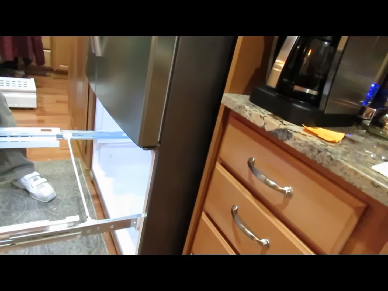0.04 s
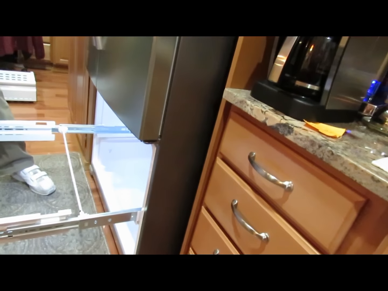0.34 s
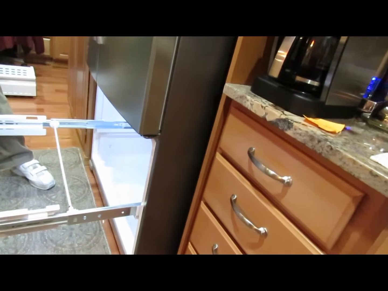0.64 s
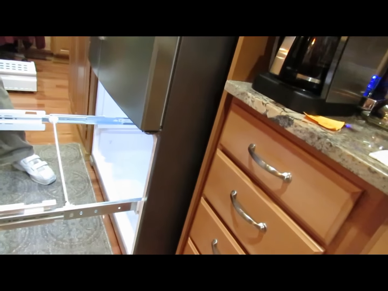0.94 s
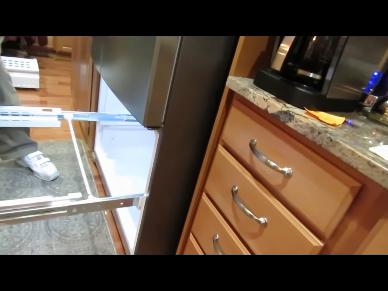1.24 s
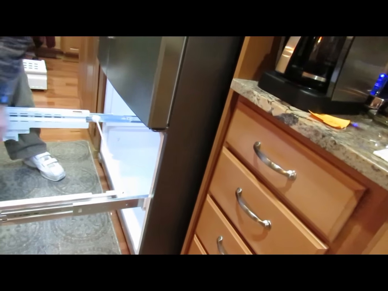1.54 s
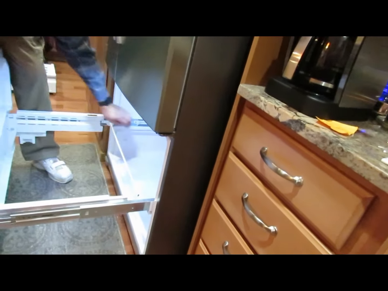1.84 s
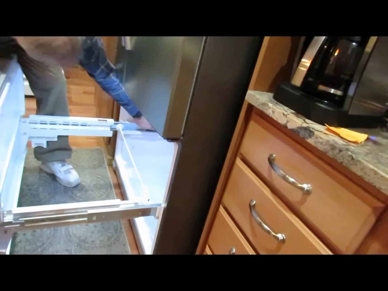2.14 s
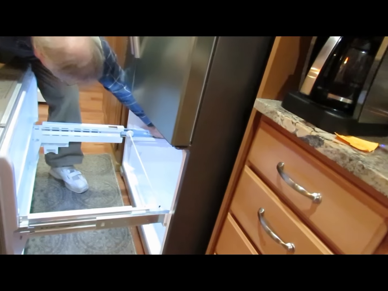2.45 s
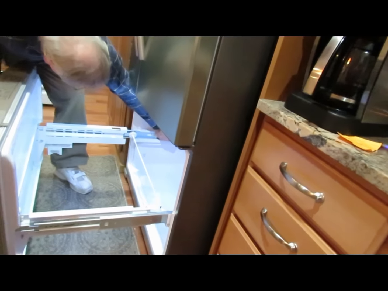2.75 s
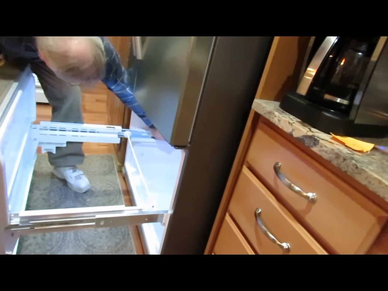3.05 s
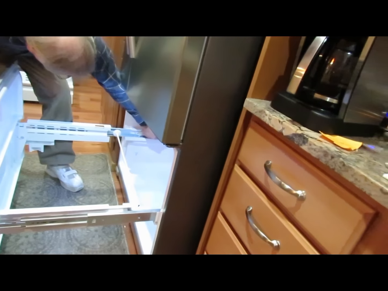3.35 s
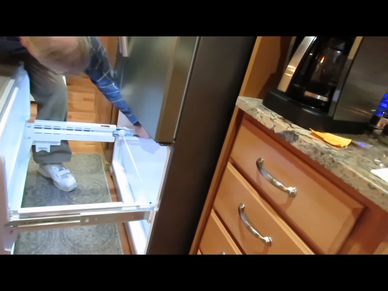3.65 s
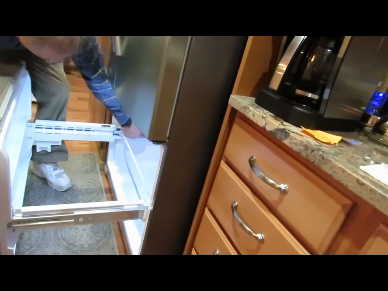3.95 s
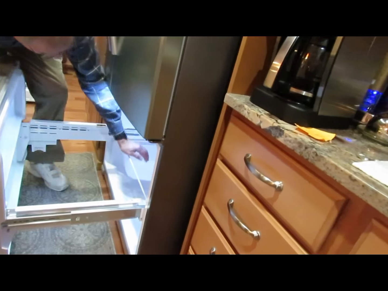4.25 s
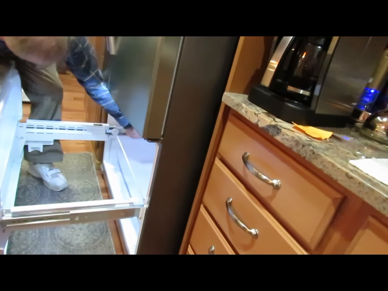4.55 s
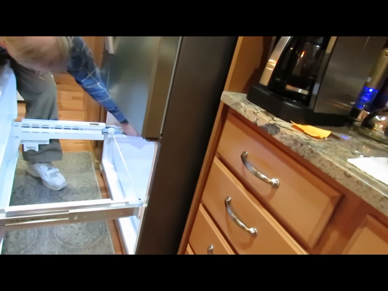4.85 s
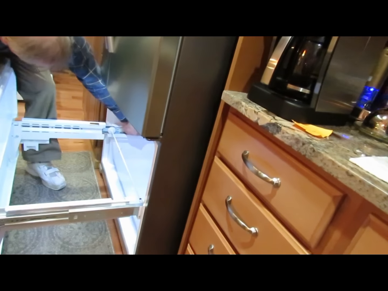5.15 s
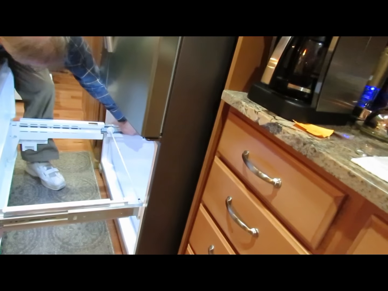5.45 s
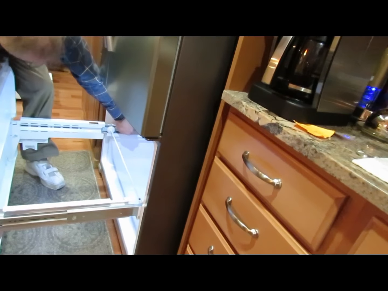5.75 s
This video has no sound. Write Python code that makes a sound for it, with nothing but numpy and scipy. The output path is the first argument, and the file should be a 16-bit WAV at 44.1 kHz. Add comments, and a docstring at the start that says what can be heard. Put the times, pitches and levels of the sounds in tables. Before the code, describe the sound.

A freezer drawer rolls on metal slides, clacking and thumping against its hollow cabinet, with small plastic clicks over a faint hum.

```python
"""Freezer drawer in a quiet kitchen

Two close microphones, the scene a little to their left. Over room air and a faint motor hum, a drawer
frame rolls on ball bearings, snaps home on its steel slides and bumps the hollow cabinet. A sleeve
rustles as a hand reaches in, clicking plastic clips and knocking the liner. The small room answers."""
import sys
import numpy as np
from scipy import signal
from scipy.fft import rfft, irfft, next_fast_len
from scipy.io import wavfile
from scipy.ndimage import map_coordinates

SR = 44100
rng = np.random.default_rng(int(sys.argv[2]) if len(sys.argv) > 2 else 0)


def int16_out(signal):
    """Quantize to a 16-bit WAV file."""
    q = np.round(np.clip(np.atleast_2d(signal).T, -1, 1) * 32767)
    wavfile.write(sys.argv[1], SR, q.astype(np.int16))


N = 264776
T = np.arange(N) / SR
RING_T = np.arange(SR // 2) / SR  # time since a contact, s


def amp(db):
    """Gain of a level in dB."""
    return 10 ** (np.asarray(db) / 20)


def unit(x):
    """x at rms 1."""
    return x / np.sqrt(np.mean(x ** 2) + 1e-20)


def along(points, hz):
    """(f/Hz, value) points read on a log frequency axis."""
    f, values = np.transpose(points)
    return np.interp(np.log(hz + 1), np.log(f + 1), values)


def peak(hz, centre, width):
    """Height 0-1 of a resonance."""
    return 1 / (1 + (2 * (hz - centre) / width) ** 2)


def lift(resonances, hz):
    """dB added by (f/Hz, width/Hz, lift/dB) resonances."""
    return sum(db * peak(hz, centre, width) for centre, width, db in resonances)


def filtered(x, response):
    """x with its spectrum scaled by response(hz)."""
    n = x.shape[-1]
    padded = next_fast_len(n + 8192)
    gain = response(np.fft.rfftfreq(padded, 1 / SR))
    return irfft(rfft(x, padded) * gain, padded)[..., :n]


def add(track, start, sound):
    """Mix a sound into the track from start seconds on."""
    part = track[..., max(round(start * SR), 0):][..., :sound.shape[-1]]
    part += sound[..., :part.shape[-1]]


# Width of diffuse sound at the microphone pair: f/Hz, side minus mid/dB
STEREO_WIDTH = [(60, -29.5), (110, -24.5), (200, -21), (380, -12), (700, -13.5), (1290, -15), (2380, -10.5),
                (4400, -8.5), (8120, -3.5), (15000, -4.5)]
def diffuse(size, side_db):
    """Stereo noise as two close microphones hear it: alike in the bass, apart in the treble."""
    mid, side = rng.standard_normal((2, size))
    side = filtered(side, lambda hz: amp(along(STEREO_WIDTH, hz) + side_db))
    return np.array([mid + side, mid - side])


def room(x, wet_db, t60):
    """The direct sound at the microphones, plus the kitchen's short answer."""
    tail = diffuse(len(RING_T), side_db=-0.5) * amp(-60 * RING_T / t60) * (1 - np.exp(-RING_T / .008))
    tail /= np.linalg.norm(tail[0])
    return x + amp(wet_db) * signal.fftconvolve(x[None], tail, axes=1)[:, :N]


def wobble(rate):
    """A smooth random curve, rate knots a second."""
    knots = rng.standard_normal(int(N * rate / SR) + 4)
    return map_coordinates(knots, [np.arange(N) * rate / SR])


# Spectrum of the air all around the microphones: f/Hz, relative level/dB
ROOM_AIR = [(15, -33.5), (25, -20.5), (109, -6.5), (139, -8), (181, 2.5), (250, -5.5), (318, -4.5),
            (709, -18.5), (927, -16.5), (1000, -18.5), (1210, -18.5), (1910, -27), (2240, -33),
            (12800, -58), (15000, -58)]
# Tones of the motor: f/Hz, rms level/dB
MOTOR_TONES = [(59.2, -56.5), (166.9, -47.5), (306.8, -64), (479.1, -56.5), (818.3, -61.5), (936.7, -60.5)]
def room_tone(air_db=-42, drone_db=-47, waver_rad=0.26):
    """Kitchen air, a motor's wavering hum and a fan's drone in two low resonances of the cabinet."""
    air = unit(filtered(diffuse(N, side_db=7.5), lambda hz: amp(along(ROOM_AIR, hz))))
    hum, lowest_hz = np.zeros(N), MOTOR_TONES[0][0]
    for hz, db in MOTOR_TONES:
        drift = waver_rad * hz / lowest_hz * wobble(3)
        hum += amp(db) * np.sqrt(2) * np.sin(2 * np.pi * hz * T + drift)
    hollow = lambda hz: peak(hz, 179, 24) + peak(hz, 296.4, 39)
    drone = unit(filtered(diffuse(N, side_db=-19.5), hollow))
    return amp(air_db) * air + hum + amp(drone_db) * drone


# Spectrum of the balls in their tracks: f/Hz, relative level/dB
BEARING_SPECTRUM = [(59, -59), (110, -15), (170, -6), (215, -9), (287, -2), (420, -8), (500, -10),
                    (600, -8.5), (800, -12), (1330, -22), (2500, -29), (5000, -44), (14000, -64)]
# Resonances of the rolling frame: f/Hz, width/Hz, lift/dB
FRAME_RESONANCES = [(293, 71, 4), (620.5, 50, 7), (850, 320, 0.5), (1510, 80, 7)]
# Pushes on the drawer: start t/s, run-up/s, release t/s, relative level at full speed/dB
DRAWER_PUSHES = [(-.05, .03, 0.0081, -39), (.09, .1, .19, -36), (1.161, 0.054, 1.527, -29),
                 (3.48, 0.2, 3.634, -28.5), (5.76, 0.34, 5.97, -31.5)]
def rolling(level_db=1, coast_db_per_s=74, ticks_per_s=380, tick_db=1):
    """Ball bearings rumble and tick, shaking the frame: each push speeds up, then coasts on release."""
    speed = np.zeros(N)
    for start, run_up, release, db in DRAWER_PUSHES:
        coast_db = coast_db_per_s * np.maximum(T - release, 0)
        speed += amp(db + level_db - coast_db) * np.clip((T - start) / run_up, 0, 1)
    ticks = unit((rng.random(N) < ticks_per_s / SR) * rng.standard_normal(N))
    rumble = diffuse(N, side_db=-15)
    drive = rumble + amp(tick_db) * unit(room(ticks, wet_db=5, t60=.25))
    colour = lambda hz: amp(along(BEARING_SPECTRUM, hz) + lift(FRAME_RESONANCES, hz))
    return speed * unit(filtered(drive, colour))


def swell(fastest, rise, sharpness=1.6):
    """Gain 0-1 of a stroke that gathers speed quickly and slows gently."""
    progress = np.maximum(1 + (T - fastest) / rise, 0)
    return (progress * np.exp(1 - progress)) ** sharpness


# Spectrum of brushing cloth: f/Hz, relative level/dB
CLOTH_SPECTRUM = [(200, -45.5), (600, 9.5), (1100, -4.5), (2300, -4.5), (4300, -13.5), (5500, -18.5),
                  (7000, -24), (12500, -31.5), (15000, -51)]
# Strokes of the arm at the drawer: fastest t/s, rise/s, relative level/dB
ARM_STROKES = [(.04, 0.12, -58.5), (0.562, 0.14, -48.5), (1.32, 0.19, -50), (2.2, 0.42, -61.5),
               (3.14, 0.28, -53), (3.61, 0.088, -50.5), (5.14, 0.096, -57.5), (5.32, 0.048, -53.5),
               (5.52, 0.19, -54), (5.95, 0.085, -48.5)]
def sleeve(level_db=7, resting_db=-63):
    """Cloth brushes softly with each stroke of the arm and rustles faintly in between."""
    stroke_power = sum((amp(db) * swell(fastest, rise)) ** 2 for fastest, rise, db in ARM_STROKES)
    rustle = unit(filtered(diffuse(N, side_db=0), lambda hz: amp(along(CLOTH_SPECTRUM, hz))))
    return rustle * amp(level_db) * np.sqrt(amp(resting_db) ** 2 + stroke_power)


def frame_modes(count=120, band_hz=(1300, 14500)):
    """The frame's many close modes at random strengths; each meets the microphones at its own phases."""
    hz = np.fft.rfftfreq(len(RING_T), 1 / SR)
    bins = np.searchsorted(hz, rng.uniform(*band_hz, count))
    strength, phase, turn = rng.standard_normal((3, count))
    phase_apart = turn * amp(along(STEREO_WIDTH, hz[bins])) * np.array([[1], [-1]])
    spectrum = np.zeros((2, len(hz)), complex)
    spectrum[:, bins] = amp(2.5 * strength) * np.exp(1j * (np.pi * phase + phase_apart))
    return unit(irfft(spectrum, len(RING_T)))


# Ring time of the frame, shortest in the high treble: f/Hz, t60/s
FRAME_DECAY = [(400, 0.26), (2800, 0.24), (6000, 0.26), (11000, 0.18)]
def frame_ring(modal_share=.45):
    """Frame and room ring as a blend of noise and modes, each frequency dying at its own speed."""
    noise = diffuse(len(RING_T), side_db=-5.5)
    steady = np.sqrt(1 - modal_share) * noise + np.sqrt(modal_share) * frame_modes()
    hz, t, spectra = signal.stft(steady, SR, nperseg=256)
    decay = amp(-60 * t / along(FRAME_DECAY, hz)[:, None])
    _, ring = signal.istft(spectra * decay, SR, nperseg=256)
    return ring[..., :len(RING_T)]


# Spectrum of steel striking steel: f/Hz, gain/dB
STEEL_BLOW = [(70, -6.5), (280, 15), (650, 15.5), (1600, 12), (3700, 7.5), (9500, 5.5), (12500, 8),
              (15000, -10)]
# A softer contact trades treble for bass: f/Hz, gain per unit of softness/dB
SOFTNESS_TILT = [(280, 0.62), (650, 0.5126), (1600, 0), (3700, -1), (9500, -4.5), (15000, -4.5)]
# Ringing peaks heard in every clack, the highest a thin treble sheen: f/Hz, width/Hz, lift/dB
RINGING_PEAKS = [(2700, 85, 2), (3390, 170, 2), (4000, 50, 3.5), (5050, 500, 4), (6100, 64, 9.5),
                 (6900, 70, 9), (7740, 100, 9.5), (10400, 580, 8), (12450, 220, 5)]
# Contacts of rails and clips:
# t/s, relative level/dB, softness (0 = bare steel), snap against ring/dB, part's f/Hz, its lift/dB
CONTACTS = [(0.2005, -26, 0.12, 8, 3350, 3.5), (.224, -29, 5.4, -5, 794, 10.6),
            (.755, -48.5, 26.4, 1.5, 575, 6), (.854, -50, 9, -3, 800, 8), (.971, -49, 5.8, 4.5, 2400, 4.2),
            (1.031, -54.5, 16.3, 4.5, 600, 22.8), (1.141, -47, 8.2, 0, 605, 12),
            (1.182, -47.5, 20, 13.5, 984, 13.4), (1.564, -38, 7.2, 4, 1524, 12.4),
            (2.185, -45.5, 2.75, 10.5, 2350, 13.6), (2.266, -55, 3, 19.5, 1250, 15.5),
            (2.356, -48.5, 28, 0.5, 750, 6.6), (2.413, -36.5, 16, -3, 1160, 12.4),
            (2.481, -41.5, 6.1, -6, 3000, 7.7), (2.975, -54.5, 7.7, -13.5, 2340, 20),
            (3.09, -49, 5, -10, 5500, 7), (3.588, -50, 16, -4, 620, 17),
            (3.661, -22.5, 8.7, -10, 1170, 6.5), (3.69, -29.5, 9.6, -1, 1360, 2),
            (3.88, -34.5, 9.7, -4, 2500, 10.4), (3.896, -32, 11.6, -3.5, 1900, 5.5),
            (4.093, -41, 9.7, 3.5, 2390, 9.4), (4.223, -52.5, 36, 2, 1060, 6.4),
            (4.462, -37.5, 10, -15, 2520, 6.5), (4.531, -43.5, 4.1, 3, 980, 19),
            (4.585, -36.5, 16, 4, 1100, 4.6), (4.704, -43, 6.1, -2, 1150, 13.7),
            (4.81, -45.5, 5.1, -7, 333, 9.7), (5.077, -50, 15, -3, 795, 13),
            (5.511, -42.5, 22, -2.5, 1600, 5), (5.825, -50, 16.6, 13.5, 675, 6.2)]
def clacks(level_db=-1, snap_t60=0.02, part_q=3.5, hard_rise_s=0.0014, rise_s_per_softness=.00008):
    """Rails and clips snap, then ring, coloured by shared ringing peaks and by the part that is hit."""
    out = np.zeros((2, N))
    lead = 256  # samples of space for the filter to ring ahead of the snap
    for start, db, softness, snap_db, part_hz, part_db in CONTACTS:
        rise = hard_rise_s + rise_s_per_softness * softness
        ring = frame_ring() * (1 - np.exp(-RING_T / rise))
        snap = amp(snap_db - 60 * RING_T / snap_t60) * diffuse(len(RING_T), side_db=2.5)
        blow = np.pad(ring + snap, [(0, 0), (lead, 0)])
        peaks = RINGING_PEAKS + [(part_hz, part_hz / part_q, part_db)]
        contact_db = lambda hz: along(STEEL_BLOW, hz) + softness * along(SOFTNESS_TILT, hz)
        clack = filtered(blow, lambda hz: amp(contact_db(hz) + lift(peaks, hz)))
        add(out, start - lead / SR, amp(db + level_db) * clack)
    return out


def panel(modes, tilt, rise, pitch=1):
    """A struck panel; tilt adds dB per octave either side of its main mode, negative for a soft blow."""
    main_hz = max(modes, key=lambda mode: mode[1])[0]
    ring = np.zeros(len(RING_T))
    for hz, db, t60 in modes:
        struck_db = db + tilt * abs(np.log2(hz / main_hz))
        ring += amp(struck_db - 60 * RING_T / t60) * np.sin(2 * np.pi * hz * pitch * RING_T)
    attack = np.sin(np.pi / 2 * np.minimum(RING_T / rise, 1)) ** 2
    return ring * attack


def choke(free, t60):
    """Gain of a ring that is free at first and then damped by a resting contact."""
    return amp(-60 * np.maximum(RING_T - free, 0) / t60)


# Modes of the cabinet's panels: f/Hz, relative level/dB, t60/s
CABINET_MODES = [(110.5, -14.5, 0.28), (143, -45, 0.066), (167.2, -1, 0.4), (208.3, -16.5, 0.99),
                 (292, -4.5, 0.28), (335, -19.5, 0.9), (419.6, -22, 0.35), (511, -20, 0.3), (580, -17, 0.2),
                 (693, -27.5, .25)]
# Bumps at the stops: t/s, relative level/dB, rise/s, tilt/(dB per octave), free ring/s, pitch factor
CABINET_BUMPS = [(.205, -7.5, 0.012, 3, 0.069, 0.98), (1.356, -26.5, .01, 9.5, 0.037, 0.98),
                 (2.496, -29, 0.0017, 1.5, 0.02, 1), (2.559, -30, 0.01, -1, 0.031, 0.98),
                 (3.632, -2, 0.0094, -24, 0.013, 0.99), (3.668, -16, 0.0032, 3, 0.15, 0.97),
                 (3.759, -11, 0.016, -5, 0.039, 0.99), (3.854, -20.5, 0.016, 0, 0.027, 0.93),
                 (3.881, -38, 0.0028, -5, 0.059, 0.87), (4.705, -29, 0.0025, 5, 0.24, 0.95),
                 (5.503, -8, 0.015, -12, 0.092, .98)]
def cabinet_bumps():
    """The frame meets its stops and the hollow cabinet booms, until the frame settles against it."""
    out = np.zeros(N)
    for start, db, rise, tilt, free, pitch in CABINET_BUMPS:
        add(out, start, amp(db) * panel(CABINET_MODES, tilt, rise, pitch) * choke(free, t60=0.21))
    return room(out, wet_db=-11, t60=.24)


# Modes of the plastic liner: f/Hz, relative level/dB, t60/s
LINER_MODES = [(110.3, -7, 0.3), (215, -3, 0.25), (248.4, 6, 0.099), (314, 3, 0.15), (363.4, -7, 0.9),
               (589, -9, 0.25), (897, -22.5, .1)]
# Knocks inside the freezer: t/s, relative level/dB, tilt/(dB per octave)
LINER_KNOCKS = [(2.354, -39.5, 5), (2.42, -31.5, 2.5), (4.533, -14, 2.5), (4.546, -28.5, 10),
                (4.575, -18.5, -6)]
def liner_knocks():
    """The hand knocks the plastic liner, then stays on it and damps its ring."""
    out = np.zeros(N)
    for start, db, tilt in LINER_KNOCKS:
        add(out, start, amp(db) * panel(LINER_MODES, tilt, rise=0.0068) * choke(free=0.027, t60=0.24))
    return room(out, wet_db=-11, t60=0.42)


def scene():
    """All sources as heard from the microphone pair, a little to the left."""
    balance = amp([[.15], [-.15]])
    return (room_tone() + rolling() + sleeve() + clacks() + cabinet_bumps() + liner_knocks()) * balance


def record(dry, top_hz=15300):
    """The recorder cuts off steeply above its band limit."""
    return filtered(dry, lambda hz: 1 / np.sqrt(1 + (hz / top_hz) ** 120))


dry = scene()
out = record(dry)
int16_out(out)
```